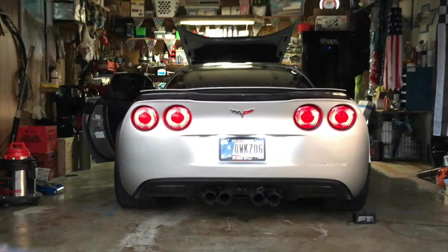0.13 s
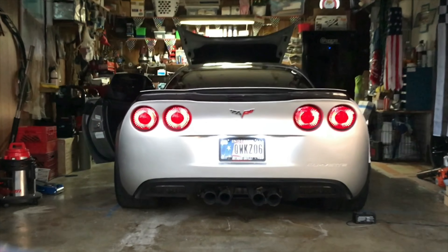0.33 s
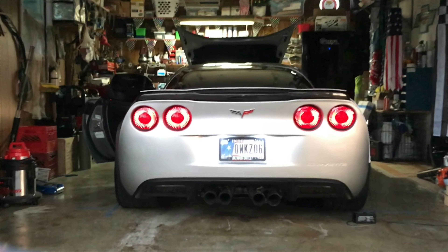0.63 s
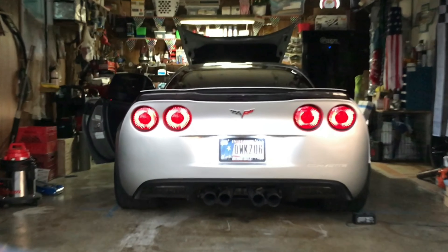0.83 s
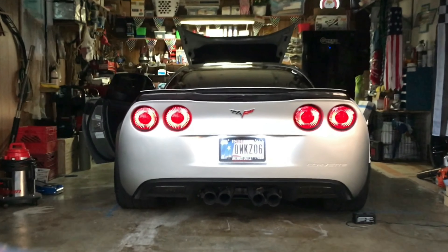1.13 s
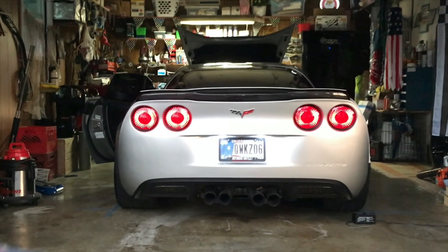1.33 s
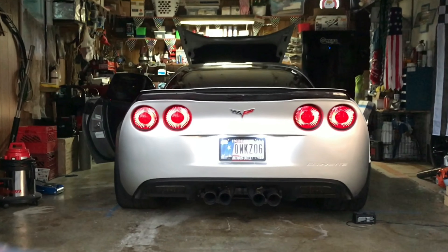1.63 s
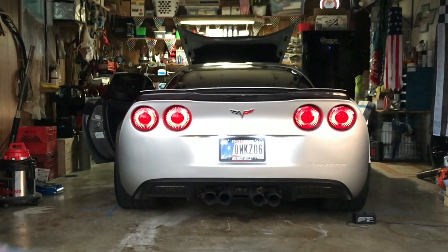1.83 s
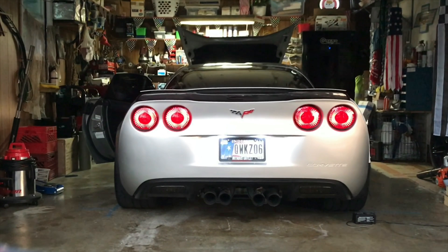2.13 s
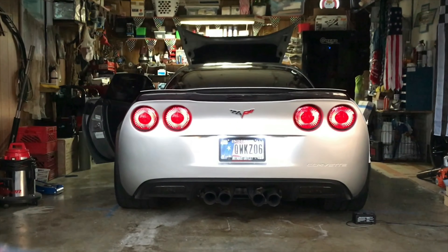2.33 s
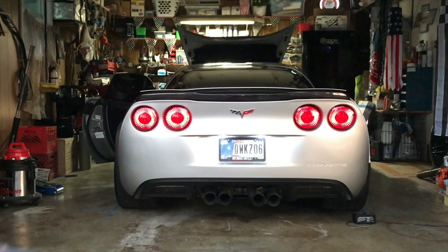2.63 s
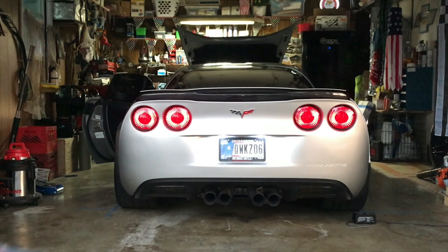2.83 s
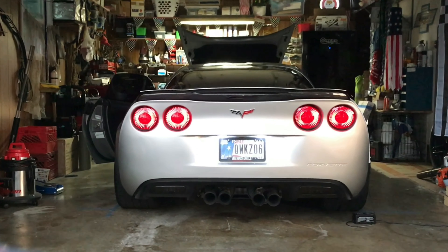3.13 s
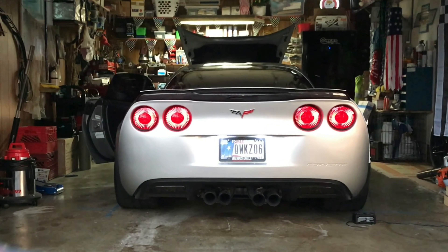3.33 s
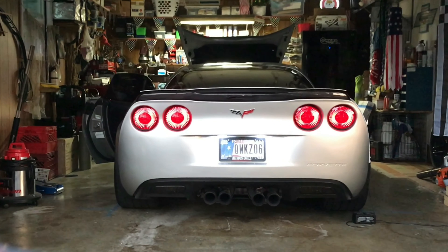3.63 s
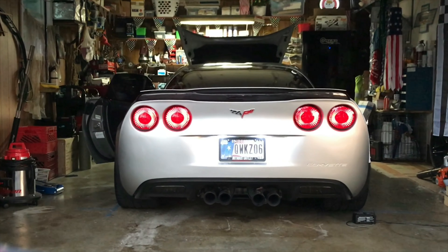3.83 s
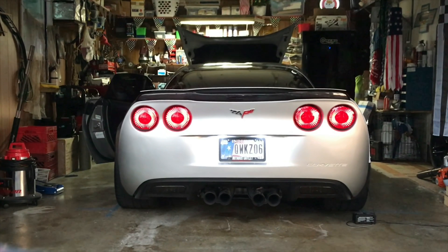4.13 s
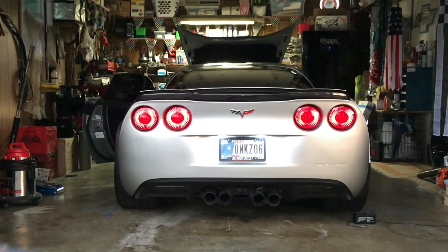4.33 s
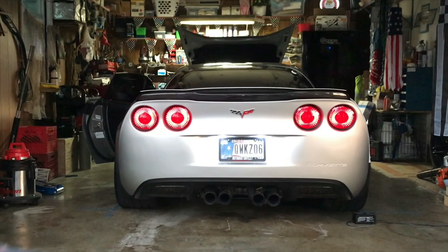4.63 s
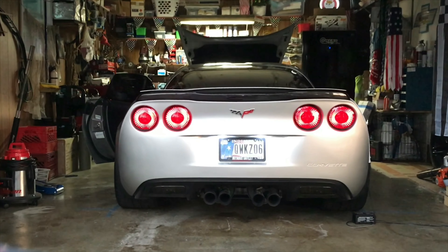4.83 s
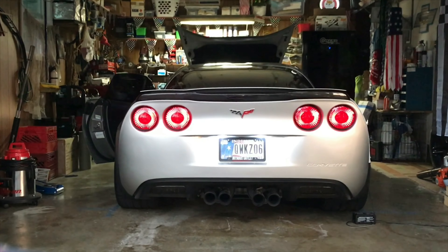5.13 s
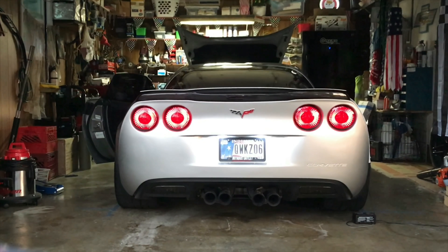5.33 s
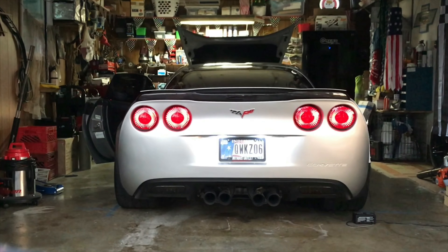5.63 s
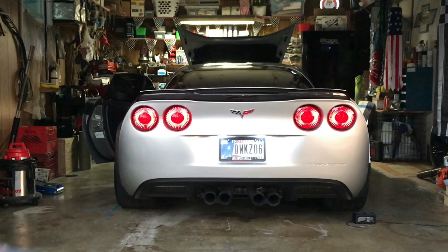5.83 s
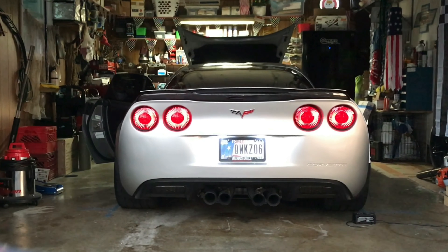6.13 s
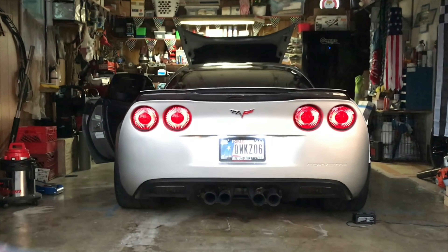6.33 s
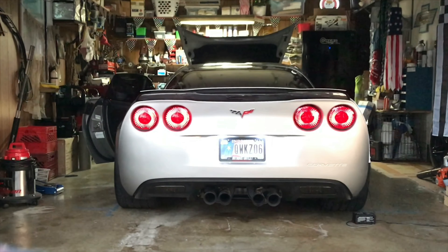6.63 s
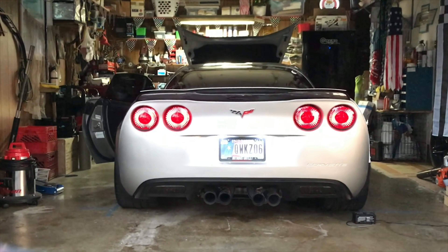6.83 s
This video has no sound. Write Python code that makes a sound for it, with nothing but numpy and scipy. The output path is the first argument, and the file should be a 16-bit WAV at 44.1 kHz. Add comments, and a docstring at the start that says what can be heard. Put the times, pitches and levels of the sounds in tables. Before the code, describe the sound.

Close behind a parked sports car in a cluttered garage, a V8 idles loudly and unevenly, deep booming pulses topped by sharp, raspy cracks and pops. Just before two seconds the exhaust valve closes and the sound drops within a tenth of a second to a duller, muffled low throb with soft puffing, faint hiss and a thin wavering hollow whine, steady to the end.

```python
"""In a closed garage, heard from behind, a V8 idles lumpily.
Firings come nearly evenly, but each cylinder mostly burns well every other turn of the firing order.
Good burns boom as slugs of gas in resonant pipes and crack as noise puffs at the tips; poor ones barely push.
Just before two seconds the exhaust valve shuts: the boom moves to the muffler and the jets drop and blur.
Underneath, resonant noise makes the bay hum and hiss, a wavering sine whines, and noise tails form the room."""
import sys
import numpy as np
from scipy import signal
from scipy.fft import rfft, irfft, next_fast_len
from scipy.io import wavfile
from scipy.ndimage import uniform_filter1d, map_coordinates

SR = 44100
rng = np.random.default_rng(int(sys.argv[2]) if len(sys.argv) > 2 else 0)


def to_wav(sig):
    """Store sig (one row per channel, or 1-D mono) as 16-bit WAV at the path in sys.argv[1].

    Samples outside -1..1 are clipped; the rate is SR.
    """
    pcm = np.clip(np.atleast_2d(sig), -1, 1) * 32767
    pcm = np.round(pcm).astype(np.int16)
    wavfile.write(sys.argv[1], SR, pcm.T)  # frames by channels


N = 307818
TIME = np.arange(N) / SR  # s

FIRING_HZ = 58.4  # nominal rate, all cylinders together
TOP_HZ = 15750  # band limit
PUSH_LEAD_S = .0014  # the pressure wave arrives just before the jet
POOR_SHUT_DB, POOR_SIZZLE_DB = -37.5, -13  # poor burn: crack with the valve shut; sizzle over any poor crack
# chance from burn to burn, standard deviations
CRACK_SCATTER_DB, SIZZLE_SCATTER_DB, TICK_SCATTER_DB = 1.5, 2, 2.5
PUSH_SCATTER, LAG_SCATTER_S, SLUG_SCATTER_S = .22, .0006, .0004
ROCK_OPEN_DB, ROCK_SHUT_DB = -27, -32  # before the push of each slug is added
WHINE_HZ, WAVER_HZ, WAVERS_PER_S = 699, 8, 18  # centre, spread of the random pitch points, points per second
WHINE_DB, SWELL_DB = -34, 4  # centre level and spread of its random points

# Levels in the tables are relative: each layer adds its own trim.
# crank running a little ahead or behind [t/s, lead/firings]
CRANK_LEAD = [(0.0, -0.16), (0.5, -0.09), (1.0, -0.07), (1.5, 0.08), (2.0, 0.25), (2.5, 0.24), (3.0, 0.19),
              (3.5, 0.19), (4.0, 0.14), (4.5, 0.11), (5.0, 0.24), (5.5, 0.15), (6.0, -0.1), (6.5, -0.16),
              (7.0, -0.18)]
# exhaust valve [t/s, opening 0-1]
VALVE_OPENING = [(0, 1), (1.86, 1), (1.91, 0.3), (1.97, 0.02), (7, 0.05)]
# cylinders in firing order [valve open: good crack level/dB, its sizzle over the crack/dB,
# poor crack level/dB; valve shut: good crack level/dB, its sizzle over the crack/dB; crack lag/ms]
CYLINDERS = [(-13, -10.5, -31, -27, -5.5, 0.29), (-15.5, -5, -34, -26, -9.5, 0.062),
             (-12.5, -13, -62, -28, -4.5, 0.06), (-9.5, -10, -29, -25, -9.5, 0.065),
             (-20.5, -8, -24, -30.5, -9, 0.19), (-14.5, -5.5, -21, -27.5, -7, 0.065),
             (-13.5, -5, -25, -25, -8, 0.18), (-13.5, -4.5, -29, -28.5, -5.5, 0.082)]
# first burn of each cylinder [1 = good, 0 = poor]
STARTS_GOOD = [1, 0, 1, 1, 1, 0, 1, 1]
# where each cylinder repeats its last kind of burn and so falls out of step, one row each [t/s, ...]
SLIPS = [
    [3.01, 3.42, 4.65, 5.06, 5.48, 5.89, 6.44],
    [1.79, 2.2, 2.62, 3.03, 4.94, 5.36, 5.77, 6.05],
    [.31, 1.95, 4.96, 5.37, 5.93],
    [1.15, 3.61, 4.71, 5.12, 5.53],
    [.75, 3.35, 5.55],
    [1.04, 3.92, 5.7, 6.11, 6.66],
    [2.15, 6.41],
    [3.4, 6.56],
]
# push of each cylinder's gas slug [good open, poor open, good shut, poor shut; linear]
PUSHES = [(1.4, .9, 2.1, .4), (1.7, 0, 1.8, 0), (2.4, .4, 1.8, .4), (1.6, .2, 1.5, 0), (2, 1.2, 2.2, 1),
          (1.2, 0, 1.3, 0), (2.1, 0, 1.9, .5), (1.7, .1, 1.3, 0)]
# slugs much stronger or weaker than their cylinder's habit [t/s, push linear]
ODD_SLUGS = [(.14, 1.5), (.225, .7), (.31, 1.5), (.378, 2.6), (.446, .7), (.479, .3), (.498, .4),
             (.616, 1.2), (.652, .4), (.686, 0), (.772, 2.6), (1.506, 2.2), (1.575, 1.5), (1.712, 1.9),
             (2.531, 1.9), (3.096, .4), (3.216, 1.1), (3.901, 1.1), (3.97, 1.9), (4.038, 1.9), (4.347, .8),
             (4.535, 2.8), (4.604, 2.4), (4.69, 2.2), (4.722, 0), (4.808, .4), (5.048, .4), (5.099, 2.8),
             (5.22, .4), (5.254, 2.6), (5.633, .4), (5.956, .7), (6.095, 1.9), (6.184, 0), (6.886, 2.2)]
# burns that stand out, loud pops and a few duds
# [t/s, crack level/dB, sizzle over the crack/dB, tick over the sizzle/dB]
POPS = [(.004, -5.5, -9, 7), (0.038, -13, -6, -2), (.056, -12.5, -7, 13), (.106, -15, 0, 0),
        (0.157, -14.5, -2, 0), (0.223, -4.5, -13.5, 10), (0.272, -18.5, -13, 0), (.309, -20, -7, -3),
        (0.323, -15, -4, 0), (0.377, -18, 5, 0), (0.3933, -10, -7, -3), (0.432, -21, -3, 0),
        (0.4975, -17, -4, -3), (0.547, -8, -8.5, 0), (0.6016, -12.5, -3, 0), (0.654, -18, 2, -2),
        (0.67, -9, -8, 0), (.705, -12.5, -1.5, -2), (0.7555, -17.5, -0.5, -8), (0.8224, -7, -9, 2),
        (0.8757, -7.5, -5.5, -2), (0.9271, -15, -2, 2), (0.979, -12, -3, 0), (0.994, -12, -2.5, 0),
        (1.095, -11.5, -12, 0), (1.148, -24, -2, -3), (1.1632, -21, 0, -6), (1.199, -13, 1.5, -7),
        (1.217, -7, -17, 0), (1.2668, -11.5, -10, 0), (1.2862, -13.5, -4.5, 10), (1.488, -8, -10, 0),
        (1.539, -8.5, -11, 7), (1.558, -12, -5, 6), (1.7104, -13, -9, 0), (1.745, -11, -8, -3),
        (1.811, -9, -12, 0), (1.846, -23, -12, 0), (1.9134, -11, -17.5, 11), (1.93, -18.5, -4, 4),
        (2.102, -29.5, 1, -1), (2.188, -40, -10, 4), (2.943, -26, -9, 3), (2.976, -22.5, -8, 0),
        (3.0469, -24, -3, -2), (3.197, -18.5, -8, -3), (3.713, -22.5, -11, 0), (3.766, -28.5, -4, 0),
        (3.866, -23.5, -5.5, 0), (3.885, -25, -9, 0), (3.969, -29.5, -3, 0), (4.056, -23.5, -6, 0),
        (4.16, -20, -10, 0), (4.262, -31, -6, 4), (4.3816, -16.5, -11.5, 0), (4.433, -22, -6.5, -2),
        (4.535, -25.5, -2.5, 2), (4.601, -22.5, -3.5, -5), (4.637, -26.5, -2, 0), (4.686, -23.5, -9, 3),
        (4.723, -38, -13, 0), (4.789, -17, -10, 7), (4.842, -22, -15, 3), (4.945, -27, -1.5, -3),
        (5.047, -27, -5, 3), (5.253, -17.5, -9, 0), (5.32, -29.5, -2, 0), (5.353, -22.5, -11, 0),
        (5.614, -21.5, -7.5, -2), (5.666, -23.5, -6, 0), (5.838, -24.5, -7, 0), (6.1855, -20.5, -11, -3),
        (6.203, -25, -1.5, -2), (6.252, -23.5, -8, 0), (6.439, -31, -1, 0), (6.475, -31, -10, 2),
        (6.493, -22, -8, 0), (6.715, -22.5, -9, -2), (6.762, -22.5, -3, -3), (6.887, -34, -2, 4),
        (6.936, -20.5, -11, -4)]
# resonances of the open pipe [f/Hz, width/Hz, level/dB]
OPEN_PIPE = [(50.5, 5.7, -2), (61.2, 13.5, 11.5), (75.8, 13, 11.5), (98.7, 6, -2), (108.6, 8, 4),
             (121, 6, -6), (135, 12, 5), (160, 14, -2), (207, 14, 3)]
# resonances of the muffler path [f/Hz, width/Hz, level/dB]
MUFFLER = [(49.5, 9.9, 2), (59, 7, -7), (76.5, 11, 3), (90.8, 12, -4), (96.4, 8, -5.5), (123.3, 18, -5),
           (146, 10, -12), (158, 12, -9), (210, 19, -5)]
# hollows under the car [f/Hz, width of one pass/Hz, level/dB]
UNDERBODY_HOLLOWS = [(613, 7.4, 3.5), (649, 51, 3.5), (717, 30, 0.5), (756, 26, -10)]
# hollows of the open tips [f/Hz, width of one pass/Hz, level/dB]
TIP_HOLLOWS = [(767, 79, 0.5), (795, 60, 1), (866.5, 83, 2.5), (912.3, 28.4, 6.5), (1196, 37, -2.5),
               (1366, 160, -11.5)]
# colour of the gas leaving the tips [f/Hz, level per Hz/dB]
CHUFF_COLOUR = [(150, -43), (220, 0.5), (500, -4.5), (1000, -10), (1300, -4.5), (1700, -29.5), (2300, -28)]
# colour of the crack at the tips [f/Hz, level per Hz/dB]
CRACK_COLOUR = [(820, -97), (1400, -23), (1640, -11), (1810, -30), (1880, -12.5), (2460, 4), (2990, 5.5),
                (3200, 2.5), (3940, -5.5), (4700, -10), (6110, -82), (10300, -120)]
# colour of the sizzle above the crack [f/Hz, level per Hz/dB]
SIZZLE_COLOUR = [(2590, -58), (4400, -6), (4860, -6), (5700, 2.5), (7390, -4.5), (9570, -3.5),
                 (10600, -18.5), (13000, -7), (16000, -35)]
# colour of the brief top of each jet [f/Hz, level per Hz/dB]
SPIT_COLOUR = [(4000, -51), (6500, 7.5), (9500, 9.5), (10600, 2), (13000, -23), (16000, -15)]
# colour of the dry edge of each jet [f/Hz, level per Hz/dB]
TICK_COLOUR = [(8000, -46), (10600, -5), (13000, -4), (16000, -4)]
# thin steel of tips and shields [f/Hz, width/Hz, level/dB, extra level with the valve open/dB]
SHELL_MODES = [(1817, 15, 8.5, -12), (1764, 17, -6, 3), (1522, 38, -12.5, 5.5), (2232, 23, 5.5, -8.5),
               (2414, 88, -11.5, 8), (2847, 85, 2.5, -2.5), (3260, 123, -6.5, 8.5), (3663, 40, 7.5, -16.5),
               (5280, 110, -20, 11.5), (6210, 140, -1, -9.5), (8460, 70, -3.5, -12)]
# muffler chambers [f/Hz, width of one pass/Hz, level/dB]
MUFFLER_CHAMBERS = [(217, 29, -7.5), (259, 16, -4.5), (317, 17, 2), (385.5, 13.6, 6.5), (414, 280, -11.5)]
# colour of the rocking block [f/Hz, level per Hz/dB]
RUMBLE_COLOUR = [(25, -40), (45, -3.5), (86, 1.5), (119, -0.5), (170, -12.5), (220, -49), (370, -120)]
# engine bay over time [t/s, hum level/dB, hiss level/dB]
BAY_LEVELS = [(0, -28, -29), (1.9, -37, -29.5), (2.05, -48, -29), (2.3, -29.5, -28.5), (4.5, -37, -29),
              (7, -32, -28.5)]
# colour of the engine bay hiss [f/Hz, level per Hz/dB]
HISS_COLOUR = [(100, -2), (170, -4.5), (222, -11), (385, -14.5), (493, -20.5), (694, 2.5), (793, -29.5),
               (1020, -17.5), (1630, -20.5), (2890, -20.5), (4920, -27), (8380, -26.5), (12000, -33),
               (16000, -32)]
# decay of the garage walls [f/Hz, t60/s]
GARAGE_DECAY = [(200, 0.74), (2000, 0.22), (10000, 0.15)]


def amp(db):
    """Gain of a level in dB."""
    return 10 ** (np.asarray(db) / 20)


def unit(x):
    """x at rms 1."""
    return x / np.sqrt(np.mean(x ** 2))


def along(points, hz):
    """Read (f/Hz, value) points on a log frequency axis."""
    f, v = np.transpose(points)
    return np.interp(np.log(hz + 1), np.log(f + 1), v)


def curves(rows):
    """One value per sample for each column after the time."""
    s, *cols = np.transpose(rows)
    return [np.interp(TIME, s, c) for c in cols]


def opening_at(seconds):
    """Valve opening at the given times."""
    return np.interp(seconds, *np.transpose(VALVE_OPENING))


def filtered(x, response):
    """x shaped by a complex response of frequency."""
    m = next_fast_len(N + SR // 2)
    hz = np.fft.rfftfreq(m, 1 / SR)
    return irfft(rfft(x, m) * response(hz), m)[:N]


def coloured(points):
    """Response that follows a colour table."""
    return lambda hz: amp(along(points, hz))


def resonances(modes):
    """Causal response of (f/Hz, width/Hz, level/dB) modes, added with their phases."""
    return lambda f: sum(amp(db) * 1j * f * w / (c * c - f * f + 1j * f * w) for c, w, db in modes)


def steep(modes):
    """Each resonance passed twice, leaving dark valleys; unrelated modes add in power."""
    def response(hz):
        return np.sqrt(sum(amp(2 * db) * np.abs(resonances([(c, w, 0)])(hz)) ** 4 for c, w, db in modes))
    return response


def noise(response, patchy_db, span):
    """Noise of rms 1 whose colour shifts in patches, span frames long."""
    z = signal.stft(rng.standard_normal(N), nperseg=256)[2]
    field = uniform_filter1d(rng.standard_normal(z.shape), size=5, axis=0)
    field = uniform_filter1d(field, size=int(span), axis=1)
    patchy = signal.istft(z * amp(patchy_db * unit(field)), nperseg=256)[1][:N]
    return unit(filtered(patchy, response))


def train(seconds, sizes):
    """One impulse per firing."""
    samples = np.clip(np.round(seconds * SR).astype(int), 0, N - 1)
    return np.bincount(samples, sizes, N)


def puffs(burst, level_db, rise, t60_open, t60_shut, response, patchy_db):
    """Turbulent noise gated by each firing: smooth rise, exponential fall, its length set by the valve."""
    t, power = TIME[:SR // 8], 0
    opening = opening_at(burst)
    for share, t60 in ((opening, t60_open), (1 - opening, t60_shut)):
        shape = (1 - np.exp(-t / rise)) ** 2 * amp(-60 * t / t60)
        impulses = train(burst, share * amp(2 * level_db))
        power = power + signal.oaconvolve(impulses, (shape / shape.max()) ** 2)[:N]
    return np.sqrt(np.abs(power)) * noise(response, patchy_db, 2.5)


def firings():
    """Times, levels and push of every firing: each cylinder alternates good and poor burns, bar its slips."""
    count = FIRING_HZ * TIME + curves(CRANK_LEAD)[0]
    even = np.interp(np.arange(int(count[-1])), count, TIME)
    turn, cylinder = np.divmod(np.arange(len(even)), len(CYLINDERS))
    slipped = np.array([np.searchsorted(SLIPS[c], s + .05) for s, c in zip(even, cylinder)])
    good = (turn + slipped + np.take(STARTS_GOOD, cylinder)) % 2 == 1
    opening = opening_at(even)

    def blend(is_open, shut):
        return opening * is_open + (1 - opening) * shut

    db, over_db, poor_db, shut_db, shut_over_db, lag_ms = np.array(CYLINDERS)[cylinder].T
    size, poor, shut_size, shut_poor = np.array(PUSHES)[cylinder].T
    chance = rng.standard_normal((len(even), 4))
    crack_db = np.where(good, blend(db, shut_db), blend(poor_db, POOR_SHUT_DB))
    crack_db = crack_db + CRACK_SCATTER_DB * chance[:, 0]
    sizzle_db = crack_db + np.where(good, blend(over_db, shut_over_db), POOR_SIZZLE_DB)
    sizzle_db = sizzle_db + SIZZLE_SCATTER_DB * chance[:, 1]
    push = np.where(good, blend(size, shut_size), blend(poor, shut_poor)) + PUSH_SCATTER * chance[:, 2]
    burst = even + lag_ms / 1000 + LAG_SCATTER_S * chance[:, 3]

    # standout burns and slugs replace the nearest firing
    s, db, over_db, dry_db = np.transpose(POPS)
    which = np.abs(s[:, None] - even).argmin(axis=1)
    burst[which], crack_db[which], sizzle_db[which] = s, db, db + over_db
    tick_db = sizzle_db + TICK_SCATTER_DB * rng.standard_normal(len(even))
    tick_db[which] = db + over_db + dry_db
    s, odd = np.transpose(ODD_SLUGS)
    push[np.abs(s[:, None] - even).argmin(axis=1)] = odd
    return even, burst, crack_db, sizzle_db, tick_db, np.clip(push, 0, None)


def boom(even, push):
    """Each slug of gas rings the open pipe, or the muffler once the valve has shut."""
    opening = curves(VALVE_OPENING)[0]
    slug = np.hanning(round(0.0062 * SR))  # the exhaust port takes a few ms to blow down
    uneven = even - PUSH_LEAD_S + SLUG_SCATTER_S * rng.standard_normal(len(even))
    flow = signal.fftconvolve(train(uneven, push), slug / slug.sum())[:N]
    flow = filtered(flow, resonances([(86.7, 43, 2.27)]))  # the shared manifold rounds each slug
    open_pipe = filtered(flow * opening, resonances(OPEN_PIPE))
    muffled = amp(0.8) * filtered(flow * (1 - opening), resonances(MUFFLER))
    return -amp(27.5) * (open_pipe + muffled)  # the pressure dips first


def tips(burst, crack_db, sizzle_db, tick_db, push):
    """Jets leave the tips as layered noise puffs, from bumper hollow and bark up to spit and tick."""
    opening = opening_at(burst)
    early = burst - .0015
    late = burst - .0022 + 0.0016 * opening  # the open jets brighten a moment later
    hollow_db = -32 + 7 * np.log10(push + 0.13) + 0.23 * (crack_db + 22.5 - 13 * opening)
    bark_db = -30 + 6 * opening + 10 * np.log10(push + 0.53) + 0.38 * (crack_db + 2.0)
    chuff_db = -37 + 9 * np.log10(push + 0.12)
    # times, level/dB, rise/s, t60 open/s, t60 shut/s, colour, patchiness/dB
    hollow = puffs(early, hollow_db, 0.0015, 0.053, 0.073, steep(UNDERBODY_HOLLOWS), 1.5)
    bark = puffs(early, bark_db, 0.00045, 0.098, 0.11, steep(TIP_HOLLOWS), 1.0)
    crack = puffs(early, crack_db - 13.0, 0.0063, 0.05, 0.092, coloured(CRACK_COLOUR), 2.0)
    sizzle = puffs(late, sizzle_db - 5.5, 0.0031, 0.028, 0.077, coloured(SIZZLE_COLOUR), 4.5)
    spit = puffs(late + 0.00026, sizzle_db - 12, 0.0029, 0.014, 0.023, coloured(SPIT_COLOUR), -2.5)
    tick = puffs(late, tick_db - 10.5 - 4 * opening, 0.002, 0.01, 0.029, coloured(TICK_COLOUR), 3.5)
    chuff = puffs(burst, chuff_db, 0.0022, 0.055, 0.057, coloured(CHUFF_COLOUR), 4.5)
    return hollow + chuff + bark + crack + sizzle + spit + tick


def shell(burst, crack_db):
    """Every firing shakes the thin steel, which rings on briefly; each mode's share varies by firing."""
    rings, knock = np.zeros(N), np.hanning(round(0.0027 * SR))
    opening = opening_at(burst)
    shares = rng.normal(0, 2.5, (len(burst), len(SHELL_MODES)))  # dB
    for (hz, w, db, open_db), share_db in zip(SHELL_MODES, shares.T):
        hits = train(burst, amp(crack_db + share_db + open_db * opening))
        shake = signal.oaconvolve(hits, knock)[:N]
        rings += filtered(shake * rng.standard_normal(N), resonances([(hz, w, db)]))
    return amp(11.5) * rings


def baffles(even, push):
    """Gas rushes through the muffler chambers, stronger with the valve shut; each slug chuffs in them."""
    rush_db = -42.5 - 3 * curves(VALVE_OPENING)[0]
    rush = amp(rush_db) * noise(steep(MUFFLER_CHAMBERS), patchy_db=3, span=4.1)
    chuff_db = -42 + 10 * np.log10(push + 0.04)
    return rush + puffs(even + 0.0036, chuff_db, 0.0035, 0.068, 0.079, steep(MUFFLER_CHAMBERS), 4.5)


def rumble(even, push):
    """The block rocks on its mounts: a low noise puff after every slug, its level following the push."""
    level_db = ROCK_SHUT_DB + (ROCK_OPEN_DB - ROCK_SHUT_DB) * opening_at(even)
    level_db = level_db + 7 * np.log10(push + 0.62)
    return puffs(even + 0.0042, level_db, 0.0052, 0.18, 0.13, coloured(RUMBLE_COLOUR), .3)


def bay():
    """Fan, belts and intake: noise hums in a few hollow resonances over a broad hiss."""
    hum_db, hiss_db = curves(BAY_LEVELS)
    hum = noise(steep(UNDERBODY_HOLLOWS), patchy_db=-1.5, span=60)
    hiss = noise(coloured(HISS_COLOUR), patchy_db=1.2, span=10)
    return amp(hum_db) * hum + amp(hiss_db) * hiss


def whine():
    """A continuous sine, a hollow tone under the car, drifts at random in pitch and level."""
    knots = rng.standard_normal(int(N * WAVERS_PER_S / SR) + 4)
    hz = WHINE_HZ + WAVER_HZ * map_coordinates(knots, [TIME * WAVERS_PER_S])
    level_knots = rng.standard_normal(len(knots))
    swell_db = SWELL_DB * map_coordinates(level_knots, [TIME * WAVERS_PER_S / 2])  # half as quick
    return amp(WHINE_DB + swell_db) * unit(np.sin(2 * np.pi * np.cumsum(hz) / SR))


def garage(x):
    """Walls answer with noise tails, each frequency dying at its own speed, fresh every quarter second."""
    wet, hop = np.zeros(N + SR), SR // 4
    for start in range(0, N, hop):
        hz, t, z = signal.stft(rng.standard_normal(SR // 2), SR, nperseg=256)
        decay = amp(-60 * t / along(GARAGE_DECAY, hz)[:, None])
        tail = signal.istft(z * decay, SR, nperseg=256)[1][:SR // 2]
        part = signal.fftconvolve(x[start:start + hop], tail / np.linalg.norm(tail))
        wet[start + 250:][:len(part)] += part  # pre-delay of 250 samples
    return wet[:N]


def scene():
    """Pipes and tips with their echo, then muffler, block, engine bay and whine."""
    even, burst, crack_db, sizzle_db, tick_db, push = firings()
    jets = tips(burst, crack_db, sizzle_db, tick_db, push) + shell(burst, crack_db)
    pipes = boom(even, push)
    room = garage(amp(-18) * pipes + amp(-8.5) * jets)
    machinery = baffles(even, push) + rumble(even, push) + bay() + whine()
    return (pipes + jets + room + machinery)[None]


def record(dry):
    """Round the highest peaks, thin the deepest bass and cut all above the band limit."""
    x = dry[0] / (1 + np.abs(dry[0] / .95) ** 4) ** (1 / 4)

    def response(hz):
        bass = (1j * hz) ** 2 / (45 ** 2 - hz ** 2 + 1j * hz * 60)  # second-order high-pass at 45 Hz
        return bass * (hz < TOP_HZ)

    return filtered(x, response)[None]


dry = scene()
out = record(dry)
to_wav(out)
```